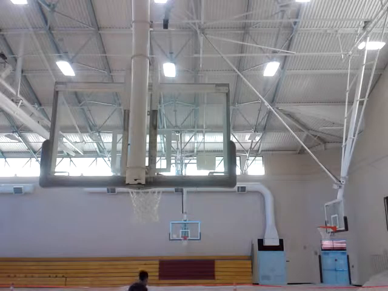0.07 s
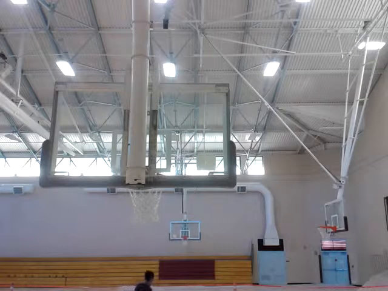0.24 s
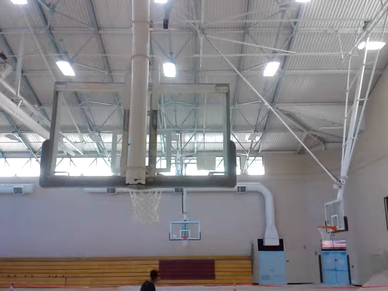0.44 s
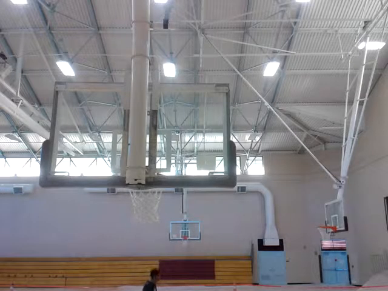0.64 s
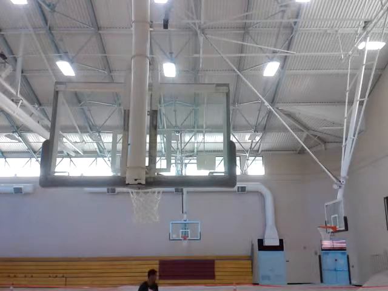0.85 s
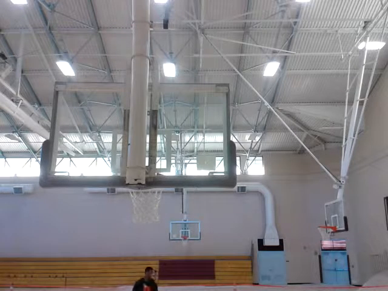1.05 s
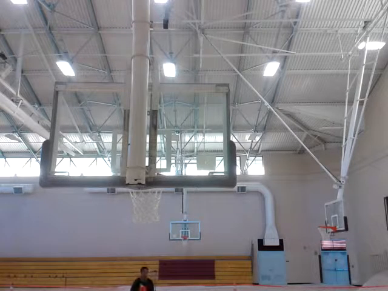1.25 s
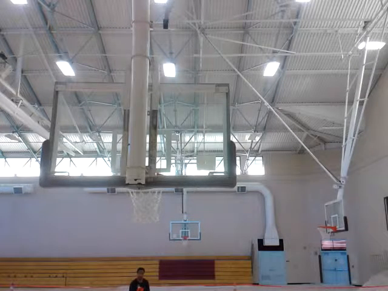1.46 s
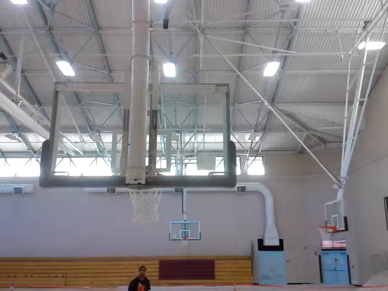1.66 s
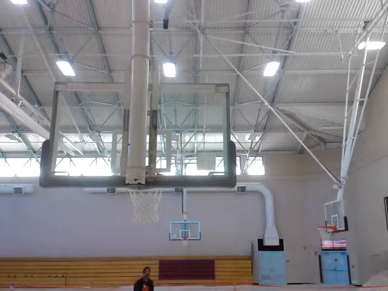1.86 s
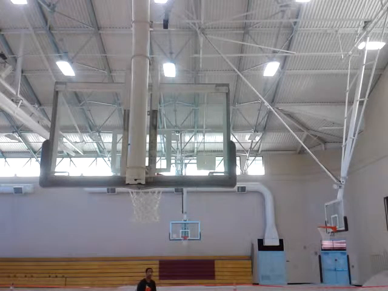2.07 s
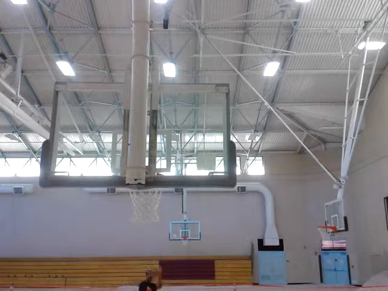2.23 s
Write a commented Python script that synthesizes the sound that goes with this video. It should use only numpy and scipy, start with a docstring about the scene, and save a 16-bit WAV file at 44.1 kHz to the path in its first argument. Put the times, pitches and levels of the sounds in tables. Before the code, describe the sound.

Three spaced basketball bounces, slapping and thudding on floorboards not far from the microphone, echo off a wall and roll around a big gym. A high sole chirp precedes the last bounce; a soft footstep follows over low air hum.

```python
"""Three basketball bounces in a large gym

A ball bounces three times on the sprung wooden floor of a large, empty gym, not far from the microphone.
Each bounce is a slap (filtered click), a deep thud with a floorboard knock and a short ping (dying sines).
A wall throws the bounce back and the hall booms on as bands of noise, each dying at its own rate.
A shoe squeaks from just before the third bounce: two gliding whistles and a rasp of noise.
Soft steps thump on the same floor; ventilation hums far off as steady noise over a faint dying hall tail."""
import sys
import numpy as np
from scipy import signal
from scipy.fft import rfft, irfft, next_fast_len
from scipy.io import wavfile
from scipy.ndimage import uniform_filter1d

SR = 44100
rng = np.random.default_rng(int(sys.argv[2]) if len(sys.argv) > 2 else 0)


def int16_out(signal):
    """Quantize to a 16-bit WAV file."""
    q = np.round(np.clip(np.atleast_2d(signal).T, -1, 1) * 32767)
    wavfile.write(sys.argv[1], SR, q.astype(np.int16))


N = 101429
TIME = np.arange(N) / SR

# Slap of rubber on wood, before the level of each contact: frequency_hz, level_db
SLAP_SPECTRUM = [(40, 3), (200, 4), (500, 11.5), (1300, 13.5), (2600, 5), (5000, 5.5), (6700, -7),
                 (10000, -8.5), (16000, -20)]
# Thud of ball and floor, before the level of each contact: frequency_hz, level_db, t60_s
THUD_MODES = [(85.5, -11.5, 0.19), (145, -3.5, 0.059), (184, -17, 0.081)]
# Knock of the floorboards, before the level of each contact: frequency_hz, level_db, t60_s
KNOCK_MODES = [(247, -20.5, 0.039), (318, -22.5, .035), (453, -27, 0.037), (727, -35, 0.057)]


def bounces():
    """Slap, thud and ping, a second push as the ball springs off, the wall's echo and the hall."""
    # One row per bounce: start_s, level_db, thud_db, knock_db, slap_brightness_hz,
    # rebound_delay_s, rebound_db, wall_echo_db, hall_db, hall_treble_db
    bounce_rows = [(0.2035, -2.5, -0.5, 1.5, 11000, .0082, 0, 0, 1.5, 0),
                   (0.8962, -1, -2.5, -4, 5790, 0.012, -9.5, -4.5, 1, -5),
                   (1.4817, -0.5, 0, 2.5, 13100, .0100, -1.5, -3, 0, 3.5)]
    thud_lag_s = .0007
    # The boom swells as it returns from the far end of the hall
    swell_s, swell_width_s, swell_db = .33, 0.03, 2.5
    swell = from_db(swell_db * bump(swell_s, swell_width_s))
    ping = ball_ping()
    out = 0
    for (start_s, level_db, thud_db, knock_db, bright_hz,
         rebound_s, rebound_db, echo_db, hall_db, treble_db) in bounce_rows:
        floor = from_db(thud_db) * ring(THUD_MODES) + from_db(knock_db) * ring(KNOCK_MODES)
        thud = delay(floor, thud_lag_s)
        push = thud + from_db(rebound_db) * delay(thud, rebound_s)
        # A heavier thud leaves more bass in the hall; only the low boom swells
        boom = tone_colour(hall_boom(), thud_db, treble_db)
        boom = boom + (swell - 1) * low_pass(boom, hz=250)
        sound = ball_slap(bright_hz) + push + ping
        sound = sound + from_db(echo_db) * wall_echo(push, ping) + from_db(hall_db) * boom
        out = out + from_db(level_db) * delay(sound, start_s)
    return out


def ball_slap(bright_hz):
    """Rubber smacks on wood and crackles; a softer contact is duller. Near reflections follow."""
    lowpass = signal.butter(3, bright_hz, fs=SR, output="sos")
    slap = signal.sosfilt(lowpass, -click(SLAP_SPECTRUM))
    crackle = dying_noise(db=-15.5, t60=0.013)
    near_reflections = dying_noise(db=-32.5, t60=0.22)
    return slap + through(slap, crackle + near_reflections)


def ball_ping():
    """The ball's air and skin ring up softly just after contact."""
    # Ring of air and skin, before the level of each bounce: frequency_hz, level_db, t60_s
    ping_modes = [(1003, -30.5, 0.2), (1210, -22.5, 0.077), (1350, -30.5, .09), (1436, -36, 0.24),
                  (1626, -35.5, .04), (2800, -37, 0.017), (3806, -15, 0.015), (3945, -13, 0.018),
                  (4450, -31, 0.013)]
    lag_s, top_hz = 0.001576, 5470
    lowpass = signal.butter(4, top_hz, fs=SR, output="sos")
    return signal.sosfilt(lowpass, delay(ring(ping_modes), lag_s))


def wall_echo(push, ping):
    """The nearest wall returns slap, ping and thud, the slap scattered by the seating."""
    # Slap thrown back by the wall, before the echo level of each bounce: frequency_hz, level_db
    wall_spectrum = [(100, 5), (800, -5), (1500, 16.5), (2400, 12), (3500, 3.5), (5500, -2), (9000, -8),
                     (16000, -28)]
    delay_s, thud_db, ping_db = .0415, -6, -12
    scatter_db, scatter_t60_s, scatter_top_hz = -21.5, 0.074, 2200
    slap = -click(wall_spectrum)
    slap = slap + through(slap, dying_noise(db=-10.5, t60=0.0023))
    scattered = through(slap, dying_noise(scatter_db, scatter_t60_s))
    scattered = low_pass(scattered, scatter_top_hz)
    return delay(slap + scattered + from_db(ping_db) * ping + from_db(thud_db) * push, delay_s)


def hall_boom():
    """Diffuse reflections: each band holds while sound crosses the hall, then dies at its own rate."""
    # Boom of the hall, before the level of each contact: frequency_hz, level_db_per_hz, hold_s, t60_s
    hall_bands = [(31.2, -68, 0.13, 1.1), (57.4, -47, 0.39, 1.2), (83.4, -39, .33, 1.03),
                  (149.2, -41, 0.36, 1.44), (224.4, -55.5, 0.23, 2.39), (411, -65.5, 0.22, 2.53),
                  (746, -73, 0.3, 1.65), (1095, -68.5, 0.18, 1.73), (1590, -66.5, 0.25, 2.24),
                  (1840, -68.5, 0.19, 2.82), (2440, -68, 0.29, 2), (2900, -74.5, 0.23, 2.02),
                  (3960, -72.5, 0.17, 1.62), (4530, -79.5, 0.17, 1.36), (5750, -83.5, 0.19, 0.9),
                  (7470, -89.5, 0.025, 1.21), (15800, -106, 0.06, 1.5)]
    size = next_fast_len(N, True)
    wash = rfft(noise(hall_bands), size)
    log_hz = np.log(np.maximum(np.arange(len(wash)) * SR / size, 1))
    log_centres = np.log([row[0] for row in hall_bands])
    out = 0
    # Each band is a triangle between its neighbours; together they add up to the whole wash
    for (_, _, hold_s, t60), pick in zip(hall_bands, np.eye(len(hall_bands))):
        band = irfft(wash * np.interp(log_hz, log_centres, pick), size)[:N]
        out = out + band * from_db(-60 * np.maximum(TIME - hold_s, 0) / t60)
    return out * hall_onset()


def hall_onset():
    """Reflections thicken after a short gap."""
    gap_s, rise_s = 0.0023, 0.027
    return 1 - np.exp(-np.maximum(TIME - gap_s, 0) / rise_s)


def squeak():
    """The sole rasps and whistles; the higher the tone, the sooner the air swallows it."""
    # Two patches of sole slipping, before flutter and jitter: start_s, pitch_hz, level_db
    high_curve = [(1.365, 6540, -51), (1.371, 6350, -39), (1.380, 5923, -44), (1.390, 6250, -44),
                  (1.405, 6390, -35), (1.418, 6150, -34), (1.445, 6340, -55)]
    low_curve = [(1.370, 5510, -53), (1.376, 5410, -38), (1.382, 4906, -43), (1.388, 4580, -34),
                 (1.398, 5200, -43), (1.412, 4940, -36.5), (1.432, 4850, -38), (1.470, 4880, -46),
                 (1.510, 4930, -46), (1.525, 5020, -74)]
    high, high_octave = slip(high_curve)
    low, low_octave = slip(low_curve)
    shrill = high_octave + low_octave + sole_rasp()
    return hall_trail(low, t60=1.62) + hall_trail(high, t60=1) + hall_trail(shrill, t60=.3)


def slip(curve):
    """Rubber sticking and slipping: an unsteady whistle with its octave."""
    jitter, flutter_db = .021, 5  # random spread of pitch (fraction) and of level
    fade_s, octave_db = .003, -19.5
    s, hz, db = np.transpose(curve)
    pitch_hz = np.interp(TIME, s, hz) * (1 + jitter * wobble(size=100))
    phase = 2 * np.pi * np.cumsum(pitch_hz) / SR
    grip = np.clip(np.minimum(TIME - s[0], s[-1] - TIME) / fade_s, 0, 1)
    level = from_db(np.interp(TIME, s, db) + flutter_db * wobble(size=200)) * grip
    return level * np.sin(phase), level * from_db(octave_db) * np.sin(2 * phase)


def sole_rasp():
    """Rasp of the sole under the squeak: a short swell of coloured noise."""
    # Rasp at its loudest: frequency_hz, level_db_per_hz
    rasp_spectrum = [(1500, -102), (2800, -85), (3800, -75), (5200, -77), (6400, -79), (7500, -93),
                     (9500, -89), (11500, -85), (13000, -96), (15000, -112)]
    return noise(rasp_spectrum) * bump(centre_s=1.39, width_s=.014)


def hall_trail(x, t60):
    """A high sound with its trail in the hall, which builds up before it dies."""
    trail_db, build_s = -33, 0.039
    return x + through(x, dying_noise(trail_db, t60) * (1 - np.exp(-TIME / build_s)))


def steps():
    """Soft thumps on the same floor: its thud and knock, a faint slap and a shortened boom."""
    # One row per step: start_s, level_db
    step_rows = [(.006, -29), (2.213, -19)]
    knock_db, slap_db, hall_db = 2, -12.5, -10
    thump = ring(THUD_MODES) + from_db(knock_db) * ring(KNOCK_MODES)
    thump = from_db(-5.5) * (thump + from_db(slap_db) * click(SLAP_SPECTRUM))
    out = 0
    for start_s, level_db in step_rows:
        boom = from_db(hall_db) * hall_boom() * from_db(-40 * TIME)  # dies 40 dB/s faster
        out = out + from_db(level_db) * delay(thump + boom, start_s)
    return out


def ventilation():
    """Distant air handling: steady noise, mostly low."""
    # Ventilation: frequency_hz, level_db_per_hz
    air_spectrum = [(25, -89), (95, -72.5), (200, -79.5), (400, -83), (800, -91), (1500, -100.5),
                    (2500, -102), (4000, -110), (5500, -115), (15000, -115)]
    return noise(air_spectrum)


def lingering_hall():
    """The hall still rings faintly at the start: coloured noise dying away."""
    # Hall tail at the first instant: frequency_hz, level_db_per_hz
    linger_spectrum = [(40, -72.5), (100, -63), (300, -82.5), (900, -96), (1400, -90.5), (1750, -92.5),
                       (2300, -92.5), (3200, -101), (4000, -104), (4330, -93.5), (4700, -112), (9000, -125)]
    t60_s = 1.64
    return noise(linger_spectrum) * from_db(-60 * TIME / t60_s)


def ring(modes):
    """Struck modes dying away."""
    return sum(from_db(db - 60 * TIME / t60) * np.sin(2 * np.pi * hz * TIME) for hz, db, t60 in modes)


def click(spectrum, size=8192):
    """The sharpest causal click with this spectrum (minimum phase, by folding the cepstrum)."""
    hz = np.arange(size // 2 + 1) * SR / size
    cepstrum = irfft(np.log(from_db(at_hz(spectrum, hz))))
    cepstrum[1:size // 2] *= 2
    cepstrum[size // 2 + 1:] = 0
    return np.pad(irfft(np.exp(rfft(cepstrum))), (0, N - size))


def noise(spectrum):
    """Steady noise with a spectrum in dB per Hz."""
    size = next_fast_len(N, True)
    white = rfft(rng.standard_normal(size))
    hz = np.arange(len(white)) * SR / size
    return irfft(white * from_db(at_hz(spectrum, hz)), size)[:N] * np.sqrt(SR / 2)


def dying_noise(db, t60):
    """White noise dying away, a dense spray of reflections or crackles."""
    return from_db(db - 60 * TIME / t60) * rng.standard_normal(N)


def wobble(size):
    """Quick random unsteadiness, spread 1, smoothed over size samples."""
    x = uniform_filter1d(rng.standard_normal(N), size=size)
    return x / x.std()


def bump(centre_s, width_s):
    """A smooth rise to 1 and fall around one moment."""
    return np.exp(-.5 * ((TIME - centre_s) / width_s) ** 2)


def tone_colour(x, bass_db, treble_db, bass_hz=400, treble_hz=5000):
    """Raise or lower the bass and the treble of a wash of noise."""
    size = next_fast_len(N, True)
    hz = np.arange(size // 2 + 1) * SR / size
    bass = bass_db / (1 + (hz / bass_hz) ** 2)
    treble = treble_db * hz ** 4 / (hz ** 4 + treble_hz ** 4)
    return irfft(rfft(x, size) * from_db(bass + treble), size)[:N]


def low_pass(x, hz):
    """Gentle treble cut."""
    return signal.sosfilt(signal.butter(1, hz, fs=SR, output="sos"), x)


def high_pass(x, hz):
    """Gentle low cut."""
    return signal.sosfilt(signal.butter(2, hz, "high", fs=SR, output="sos"), x)


def through(x, response):
    """Pass a sound through an impulse response."""
    return signal.fftconvolve(x, response)[:N]


def delay(x, s):
    """The sound, s seconds later."""
    return np.pad(x, (max(round(s * SR), 0), 0))[:N]


def at_hz(points, hz):
    """Read the level column of a table along log frequency."""
    points = np.array(points)
    return np.interp(np.log(np.maximum(hz, 1)), np.log(points[:, 0]), points[:, 1])


def from_db(db):
    """Decibels to gain."""
    return 10 ** (np.asarray(db) / 20)


def scene():
    """Everything in the gym, on one channel."""
    return (bounces() + squeak() + steps() + ventilation() + lingering_hall())[None]


def record(dry):
    """The microphone loses the deepest bass and the top is cut."""
    mic_low_hz, cutoff_hz = 37.6, 16800
    sound = high_pass(high_pass(dry, mic_low_hz), mic_low_hz)
    return signal.sosfilt(signal.cheby2(16, 60, cutoff_hz, fs=SR, output="sos"), sound)


dry = scene()
out = record(dry)
int16_out(out)
```